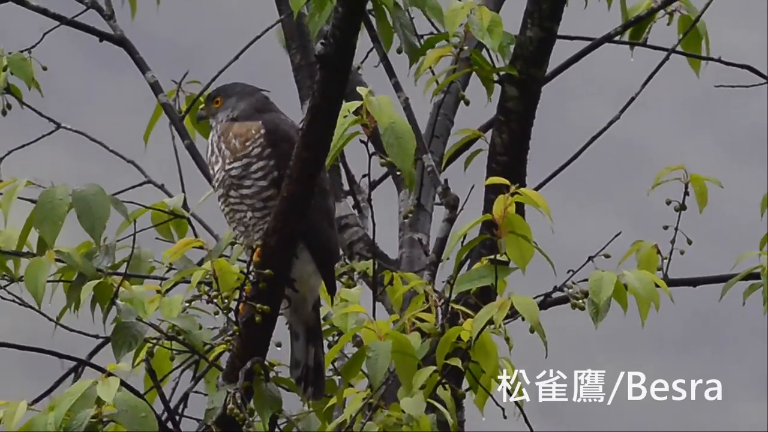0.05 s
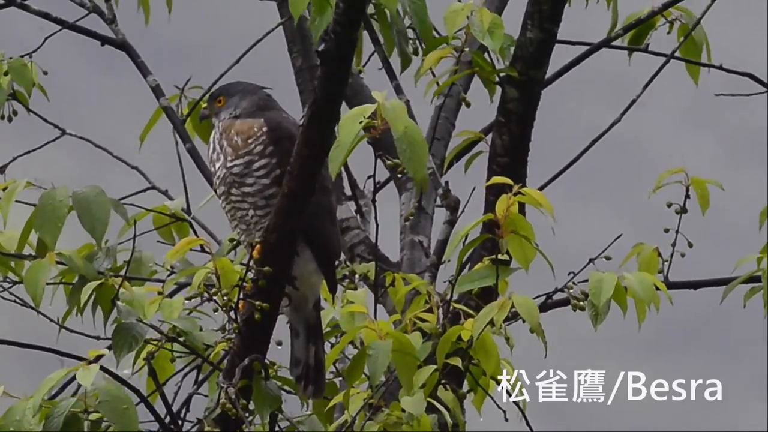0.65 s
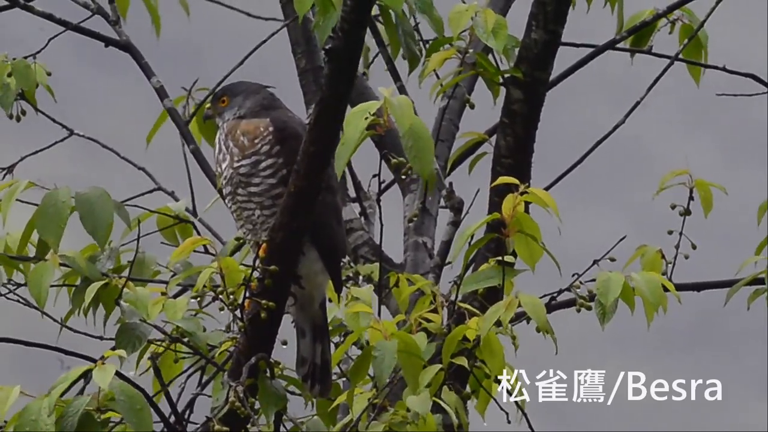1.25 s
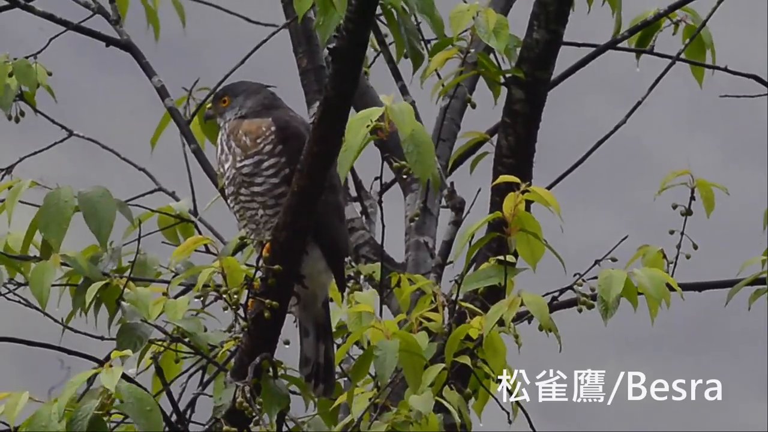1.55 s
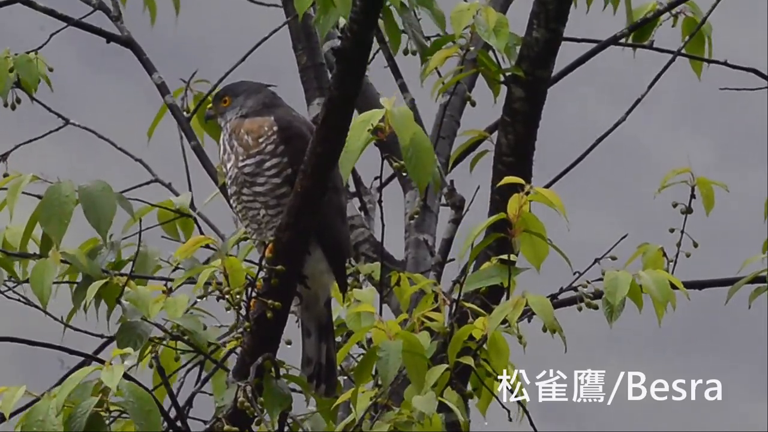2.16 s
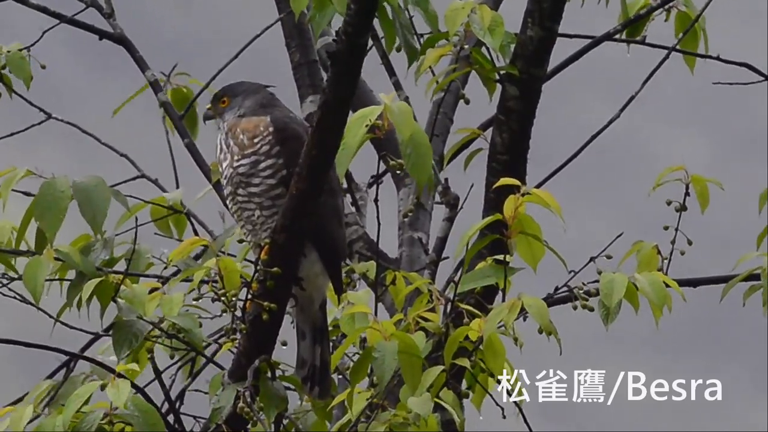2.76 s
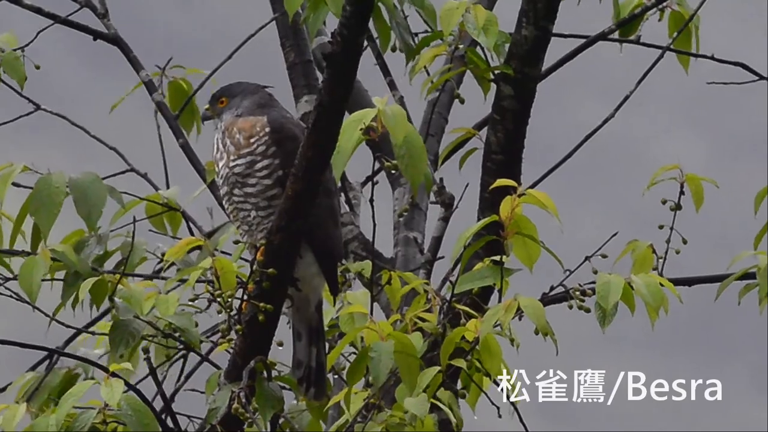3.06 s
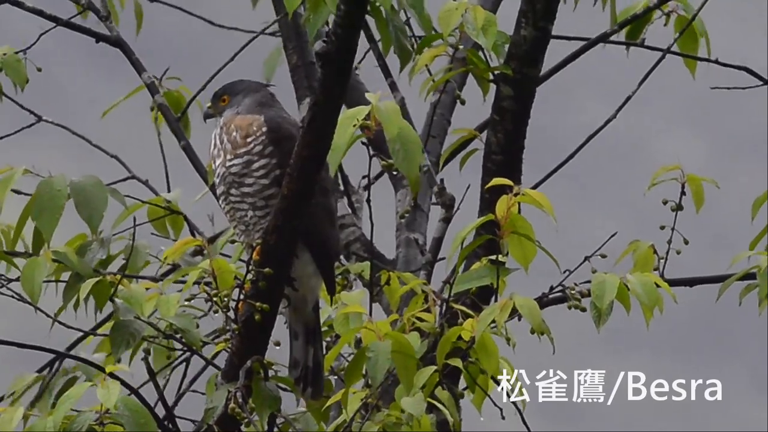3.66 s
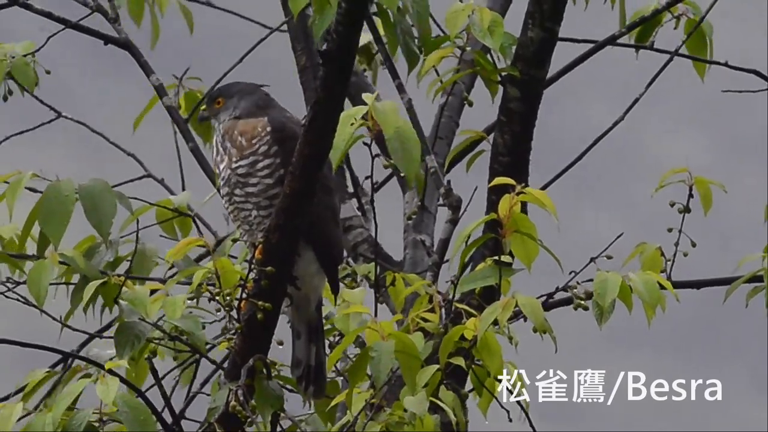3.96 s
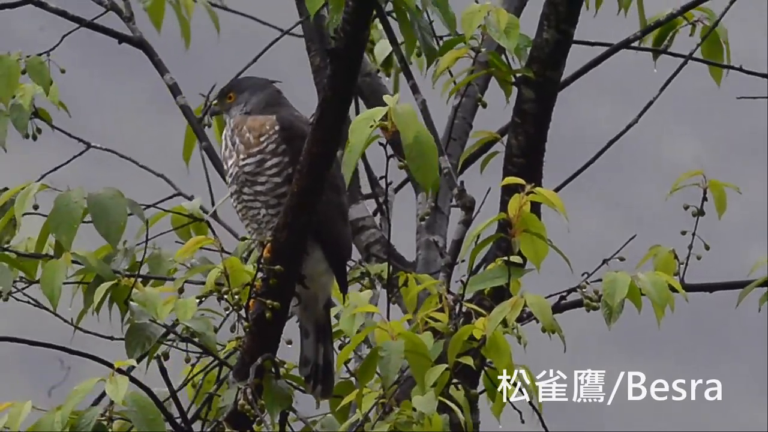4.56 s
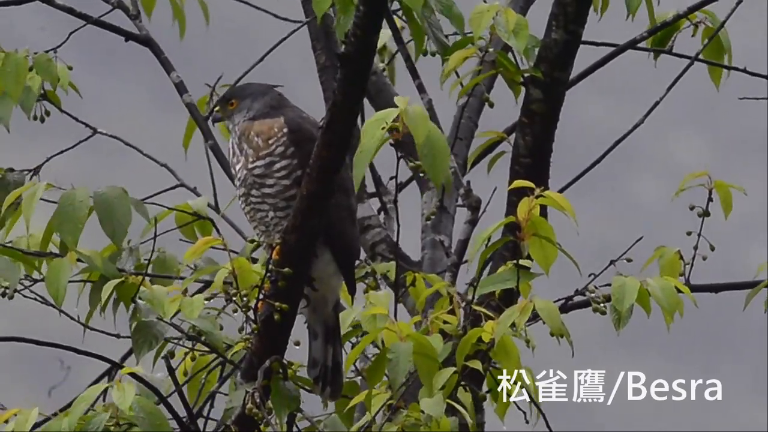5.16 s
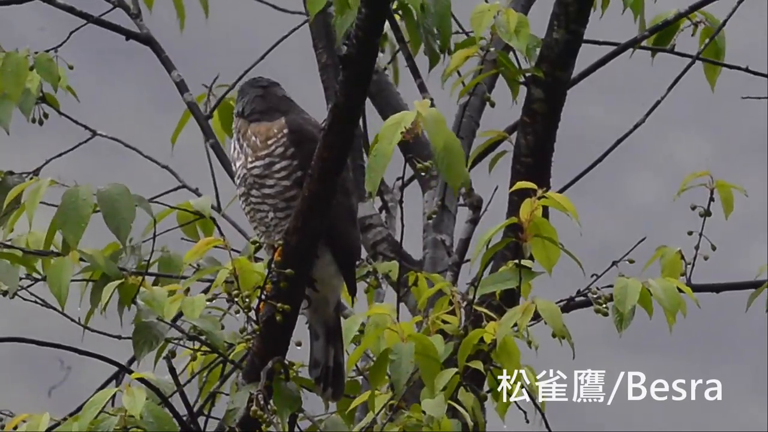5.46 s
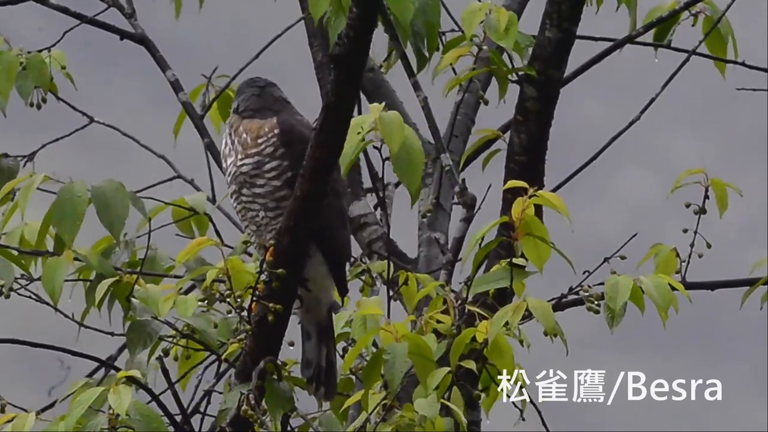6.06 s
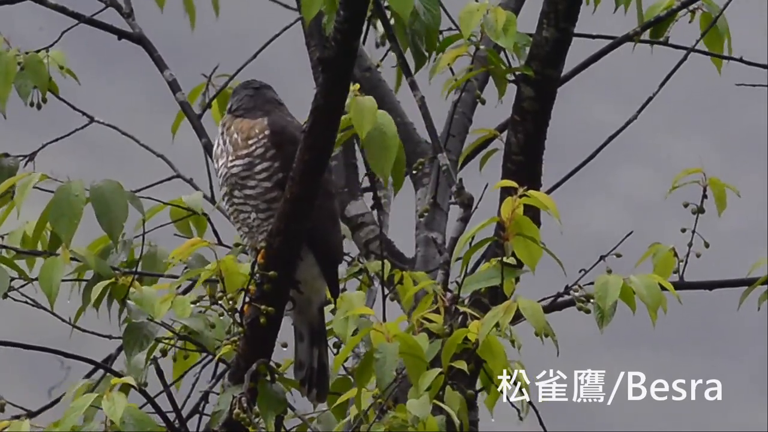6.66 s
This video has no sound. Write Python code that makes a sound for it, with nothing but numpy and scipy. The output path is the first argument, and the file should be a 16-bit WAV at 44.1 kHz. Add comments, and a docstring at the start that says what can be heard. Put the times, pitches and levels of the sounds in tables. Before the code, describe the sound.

In a wooded valley, over a steady low hiss and scattered soft knocks, a nearby hawk yelps sharply several times with pauses between. Its calls then quicken into a rapid chatter, leaving a tail in the trees. A songbird whistles thinly once early and twice as the chatter ends, with faint distant chirps throughout. The whole sound dips briefly to silence and comes back.

```python
"""Hawk in a wooded valley

A small perched hawk gives clipped, arching yelps, then a run that speeds up into a chatter: harmonics
filtered by its throat and beak. Trees scatter every note into a long tail. A songbird adds thin, nearly
pure whistles and others call far off, over a steady valley hiss with soft knocks and ticks.
Near the end the whole sound fades out and comes back."""
import sys
import numpy as np
from scipy import signal
from scipy.fft import rfft, irfft
from scipy.io import wavfile
from scipy.ndimage import uniform_filter1d, minimum_filter1d

SR = 44100
rng = np.random.default_rng(int(sys.argv[2]) if len(sys.argv) > 2 else 0)


def generate_wav(sig):
    """Save sig (samples, or channels by samples) to the path in sys.argv[1] as 16-bit PCM at SR."""
    pcm = np.round(np.clip(np.atleast_2d(sig).T, -1, 1) * 32767).astype(np.int16)
    wavfile.write(sys.argv[1], SR, pcm)


N = 304731
TIME = np.arange(N) / SR

# Spectrum of the valley hiss: frequency_hz, relative_density_db
HISS_SPECTRUM = [(205, 5.5), (235, -1), (310, -3.5), (480, -6), (650, -9.5), (1000, -14.5), (1300, -18),
                 (1650, -24), (2100, -29.5), (3200, -31), (6000, -36), (10000, -38), (15500, -39.5)]
# Glides of distant birds: start_s, length_s, start_hz, end_hz, level_db, waver_share (of the pitch)
DISTANT_GLIDES = [(0.0, 0.14, 3400, 3200, -50.5, 0.018), (.24, 0.092, 4000, 4420, -47, .012),
                  (.335, 0.074, 4330, 3720, -41.5, .012), (0.578, 0.11, 4460, 4060, -42, 0.0072),
                  (1.38, 0.16, 4520, 4150, -53.5, .025), (1.52, 0.17, 3830, 3650, -44, .012),
                  (1.925, 0.2, 6630, 6710, -48.5, .025), (1.94, 0.4, 3670, 3610, -45.5, .012),
                  (1.98, .11, 7280, 7420, -50.5, .025), (2.266, 0.61, 6500, 5900, -52.5, .025),
                  (2.36, 0.29, 3600, 3820, -49.5, .012), (2.39, 0.17, 4250, 4420, -50, .025),
                  (3.10, 0.067, 3900, 3950, -44.5, .012), (3.33, .09, 3800, 3900, -54, .012),
                  (3.41, .09, 3640, 3320, -42, 0.0083), (5.62, .14, 5440, 5500, -45.5, .014),
                  (5.466, 0.42, 6030, 6150, -54.5, .025), (5.76, 0.62, 5440, 5600, -46, .016),
                  (5.77, .10, 6350, 6200, -41.5, .025), (5.92, 0.6, 6150, 6280, -49.5, .025),
                  (6.419, .35, 6570, 6550, -55.5, 0.0247)]
# Soft, dull knocks: start_s, level_db
KNOCK_EVENTS = [(0.114, -21), (0.781, -24), (1.021, -20), (1.235, -19.5), (1.437, -18), (1.636, -15),
                (2.185, -19), (2.313, -22.5), (3.291, -22), (3.537, -20), (3.795, -13), (4.011, -15),
                (4.768, -15), (4.858, -19), (5.31, -16.5), (5.808, -24.5), (6.570, -19), (6.691, -19.5),
                (6.785, -23.5)]
# Sharp little ticks: start_s, level_db, centre_hz
TICK_EVENTS = [(0.185, -41, 8000), (1.562, -45, 9100), (1.809, -24.5, 3000), (3.628, -47, 3000),
               (5.343, -60.5, 5980), (5.831, -46, 4000), (5.993, -40.5, 4500)]
# The hawk's notes: start_s, fall_s, top_pitch_hz, level_db, second_harmonic_lift_db
HAWK_NOTES = [(0.403, .072, 1933, -25.5, -1.5), (1.643, 0.073, 1938, -23.5, -2),
              (2.682, 0.078, 1942, -24.5, -1.5), (2.892, 0.023, 1739, -33.5, 6.5),
              (3.662, 0.077, 1930, -21.5, -3.5), (3.838, 0.03, 1922, -25.5, 5),
              (3.963, 0.037, 2066, -25, 7), (4.081, 0.07, 2174, -22.5, 8), (4.243, 0.1, 2260, -21.5, 7.5),
              (4.424, 0.037, 2260, -21.5, 9.5), (4.553, 0.037, 2315, -24.5, 11),
              (4.679, .038, 2292, -25.5, 9.5), (4.784, 0.03, 2262, -24, 9), (4.880, 0.024, 2239, -26, 8.5),
              (4.979, 0.029, 2168, -27.5, 7.5), (5.050, 0.028, 2130, -30, 8), (5.122, .016, 1976, -31.5, 8)]
# The slide after a note's crest: fall_time_share, pitch_drop_share, level_db
HAWK_SLIDE = [(0, 0, 1), (.13, 0.058, 0), (0.331, .43, -6), (.58, .77, -9), (.85, .97, -13), (1, 1, -13.5)]
# Resonances of the hawk's throat and beak: frequency_hz, gain_db
THROAT_RESPONSE = [(1300, 3.5), (1900, -3), (2300, 1.5), (2650, 3.5), (3200, -3), (3850, 3.5), (4350, 6.5),
                   (5150, -2.5), (5750, -2.5), (6300, -7), (6750, -6), (7100, -19), (7750, -9), (8700, -30),
                   (9700, -25), (11000, -36)]
# The songbird's whistles: start_s, length_s, time_to_lowest_s, lowest_pitch_hz, level_db
SONGBIRD_WHISTLES = [(1.548, 0.28, 0.15, 8485, -18), (4.963, 0.25, .13, 8476, -19),
                     (5.497, 0.23, .08, 8420, -20)]


def from_db(db):
    """Amplitude grows tenfold for every 20 decibels."""
    return 10 ** (np.asarray(db) / 20)


def unit_rms(x):
    """Division by the root mean square gives unit power."""
    return x / np.sqrt(np.mean(x ** 2) + 1e-20)


def gain_at(spectrum, hz):
    """Interpolation in decibels over log frequency gives the gain of a spectrum."""
    freqs_hz, levels_db = np.transpose(spectrum)
    return from_db(np.interp(np.log(np.maximum(hz, 1)), np.log(freqs_hz), levels_db))


def drift(rate_hz, size):
    """Low-pass filtering turns white noise into a smooth random motion of unit power."""
    pole = np.exp(-2 * np.pi * rate_hz / SR)
    noise = rng.standard_normal(size + SR // 10)
    return unit_rms(signal.lfilter([1], [1, -2 * pole, pole * pole], noise)[-size:])


def add(track, start_s, sound):
    """Superposition: a sound adds to the track from its start time."""
    at = max(int(start_s * SR), 0)
    track[at:at + len(sound)] += sound[:max(N - at, 0)]


def low_cut(x, edge_hz=200, leak_db=-38):
    """A steep high-pass filter with a leak passes only a trace of rumble."""
    steep = signal.cheby1(12, .5, edge_hz, "high", fs=SR, output="sos")
    return signal.sosfilt(steep, x) + from_db(leak_db) * x


def tone(pitch_hz, waver, waver_rate_hz):
    """Random frequency modulation gives a pure tone a quiver."""
    quiver = 1 + waver * drift(waver_rate_hz, SR)[:len(pitch_hz)]
    return np.sin(2 * np.pi * np.cumsum(pitch_hz * quiver) / SR)


def valley_hiss(level_db, sway_db, sway_rate_hz):
    """Noise with a falling spectrum makes a dull rush; slow amplitude modulation sways it."""
    colour = gain_at(HISS_SPECTRUM, np.fft.rfftfreq(N, 1 / SR))
    noise = irfft(rfft(rng.standard_normal(N)) * colour, N)
    return from_db(level_db + sway_db * drift(sway_rate_hz, N)) * unit_rms(low_cut(noise))


def distant_birds(waver_rate_hz, edge_share):
    """Linear glides swell, hold and die; deep frequency modulation turns a whistle into a buzz."""
    out = np.zeros(N)
    for start_s, length_s, start_hz, end_hz, level_db, waver in DISTANT_GLIDES:
        along = np.linspace(0, 1, int(length_s * SR))
        pitch_hz = start_hz + (end_hz - start_hz) * along
        swell = np.minimum(np.minimum(along, 1 - along) / edge_share, 1)
        add(out, start_s, from_db(level_db) * swell * tone(pitch_hz, waver, waver_rate_hz))
    return out


def tree_echoes(x, near_db, far_db, near_t60_s=.22, far_t60_s=.82, near_build_s=.008, far_build_s=.028):
    """Scattering: nearby leaves and branches return quick echoes, the trees beyond a long tail."""
    t = TIME[:int(1.5 * SR)]
    near, far = rng.standard_normal((2, len(t)))
    near = near * from_db(-60 * t / near_t60_s) * (1 - np.exp(-t / near_build_s))
    far = far * from_db(-60 * t / far_t60_s) * (1 - np.exp(-t / far_build_s))
    response = from_db(near_db) * near / np.linalg.norm(near) + from_db(far_db) * far / np.linalg.norm(far)
    return signal.fftconvolve(x, response)[:N]


def knocks(swell_s, mode_hz, thump_hz, thump_db, gain_db):
    """Damped vibration: each soft contact excites a few cycles of one mode over a lower thump."""
    out, t = np.zeros(N), TIME[:SR // 10]
    envelope = t / swell_s * np.exp(1 - t / swell_s)
    mode = np.sin(2 * np.pi * mode_hz * t)
    for start_s, level_db in KNOCK_EVENTS:
        thump = from_db(thump_db) * np.sin(2 * np.pi * (thump_hz * t + rng.random()))
        add(out, start_s, from_db(level_db + gain_db) * envelope * (mode + thump))
    return out


def ticks(t60_s):
    """A brief transient has a broad spectrum: each tiny crack is a fast-decaying band of noise."""
    out, t = np.zeros(N), TIME[:SR // 20]
    for start_s, level_db, centre_hz in TICK_EVENTS:
        edges_hz = [centre_hz / 2, min(centre_hz * 1.53, SR / 2 - 1000)]
        band = signal.butter(1, edges_hz, "band", fs=SR, output="sos")
        crack = unit_rms(signal.sosfilt(np.vstack([band, band]), rng.standard_normal(len(t))))
        add(out, start_s, from_db(level_db - 60 * t / t60_s) * crack)
    return out


def hawk(rise_s, scoop, drop_hz, drop_time_s, jitter, shimmer, rasp_db, bloom):
    """Source and filter: as each note arches, its harmonics sweep through the throat's resonances.
    Returns the direct sound and the sound spread into the trees."""
    direct, spread = np.zeros((2, N))
    time_share, drop_share, slide_db = np.transpose(HAWK_SLIDE)
    k = np.arange(1, 7)[:, None]   # harmonic numbers
    for start_s, fall_s, top_hz, level_db, lift_db in HAWK_NOTES:
        t = TIME[:int((rise_s + fall_s) * SR)]
        climb, slide = np.minimum(t / rise_s, 1), np.maximum(t - rise_s, 0) / fall_s
        drop = drop_hz / top_hz * (1 - np.exp(-fall_s / drop_time_s))   # short notes fall less far
        arch = (1 - scoop * (1 - climb) ** 2) * (1 - drop * np.interp(slide, time_share, drop_share))
        pitch_hz = top_hz * arch * (1 + jitter * drift(340, SR)[:len(t)])
        phase = 2 * np.pi * np.cumsum(pitch_hz) / SR
        throat = gain_at(THROAT_RESPONSE, k * pitch_hz) * from_db(lift_db * (k == 2))
        # fast unevenness of the membranes spreads a rasp around each harmonic
        uneven = (1 + shimmer * drift(100, SR) + from_db(rasp_db) * drift(1000, SR))[:len(t)]
        attack = np.sin(np.pi / 2 * np.minimum(climb / 0.66, 1)) ** 2
        swell = attack * from_db(np.interp(slide, time_share, slide_db))
        release = np.minimum((t[-1] - t) / 0.00082, 1)
        effort = swell ** (1 + bloom * (k - 1))   # upper harmonics bloom around the crest
        harmonics = from_db(level_db) * throat * uneven * effort * release * np.sin(k * phase)
        add(spread, start_s, harmonics.sum(axis=0))
        # high harmonics leave the beak in a beam: aimed aside late in the run, they go by the trees
        loss_db_per_harmonic = 0.5 + 15.5 * np.exp(-((start_s - 4.89) / .22) ** 2)
        add(direct, start_s, (harmonics * from_db(-loss_db_per_harmonic * (k - 1))).sum(axis=0))
    return direct, spread


def songbird(waver, waver_rate_hz, bend_hz, bend_s, swell_db, swell_share, release_s):
    """A modulated pure tone: each whistle swells as its pitch dips, holds as it climbs, then stops."""
    out = np.zeros(N)
    for start_s, length_s, dip_s, lowest_hz, level_db in SONGBIRD_WHISTLES:
        t = TIME[:int(length_s * SR)]
        pitch_hz = lowest_hz + bend_hz * (1 - np.exp(-((t - dip_s) / bend_s) ** 2))
        swell = from_db(level_db - swell_db * np.maximum(1 - t / (swell_share * length_s), 0))
        ends = np.minimum(t / .0067, 1) * np.minimum((length_s - t) / release_s, 1) ** 2
        add(out, start_s, swell * ends * tone(pitch_hz, waver, waver_rate_hz))
    return out


def limit(x, ceiling=1.1, window_samples=65):
    """Peak limiting: the gain dips around any crest above the ceiling; tips past full scale clip."""
    allowed = ceiling / np.maximum(np.abs(x), ceiling)
    gain = uniform_filter1d(minimum_filter1d(allowed, window_samples), window_samples)
    return np.clip(x * gain, -1, 1)


def scene():
    """Direct and scattered sound add: the hawk near, the songbird further, others deep in the trees."""
    direct, spread = hawk(rise_s=.022, scoop=.22, drop_hz=574.7, drop_time_s=.017,
                          jitter=0.004, shimmer=0.2, rasp_db=-24, bloom=0.1)
    yelps = from_db(1.5) * direct + tree_echoes(spread, near_db=1.5, far_db=-1)
    whistles = songbird(waver=0.0042, waver_rate_hz=330, bend_hz=707, bend_s=.115,
                        swell_db=24, swell_share=0.45, release_s=.035)
    song = from_db(-2.5) * whistles + tree_echoes(whistles, near_db=1.5, far_db=-5, near_build_s=.005)
    glides = distant_birds(waver_rate_hz=130, edge_share=0.22)
    far_calls = from_db(1.5) * glides + tree_echoes(glides, near_db=-1.5, far_db=-1)
    knocking = low_cut(knocks(swell_s=.0035, mode_hz=451.6, thump_hz=276, thump_db=-8, gain_db=-1))
    ticking = ticks(t60_s=0.088)
    hiss = valley_hiss(level_db=-32.5, sway_db=0.84, sway_rate_hz=5.4)
    return (yelps + song + far_calls + knocking + ticking + hiss)[None]


def record(dry):
    """Linear fades take the sound to silence and back; a limiter and a low-pass filter follow."""
    silent_from_s, silent_to_s, fade_out_s, fade_in_s = 6.354, 6.43, 0.53, 0.61
    cutoff_hz = 15700
    falling, rising = (silent_from_s - TIME) / fade_out_s, (TIME - silent_to_s) / fade_in_s
    fade = np.clip(np.maximum(falling, rising), 0, 1)
    low_pass = signal.ellip(12, .1, 80, cutoff_hz, fs=SR, output="sos")
    return signal.sosfilt(low_pass, limit(dry * fade))


dry = scene()
out = record(dry)
generate_wav(out)
```